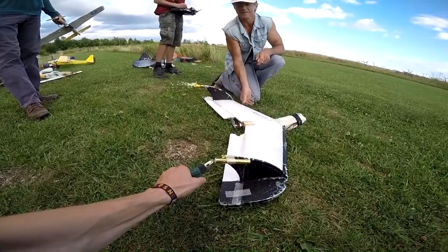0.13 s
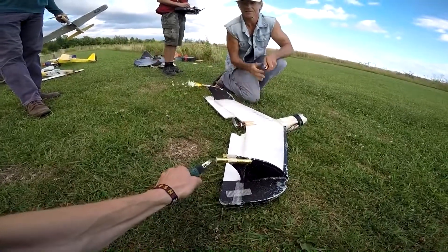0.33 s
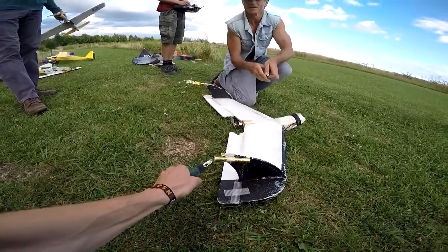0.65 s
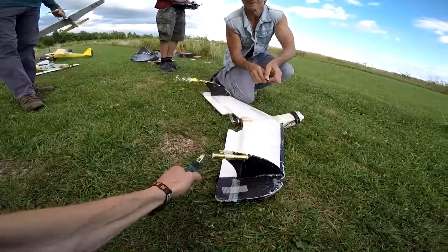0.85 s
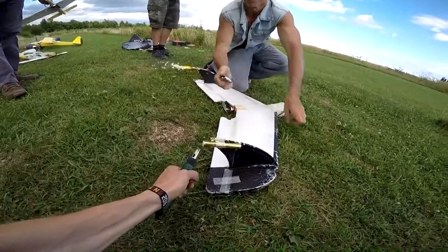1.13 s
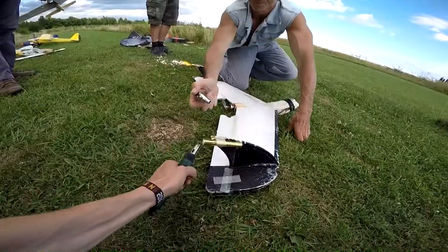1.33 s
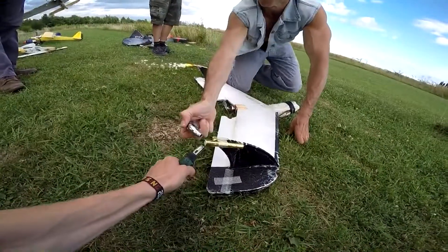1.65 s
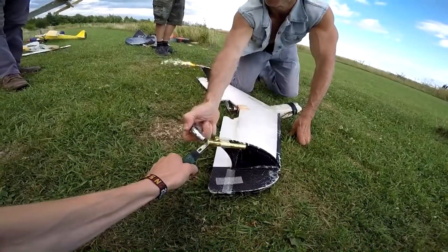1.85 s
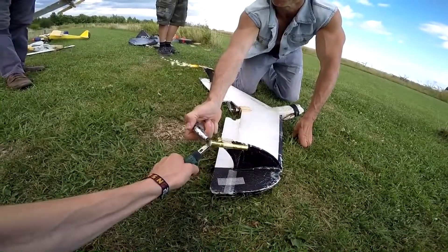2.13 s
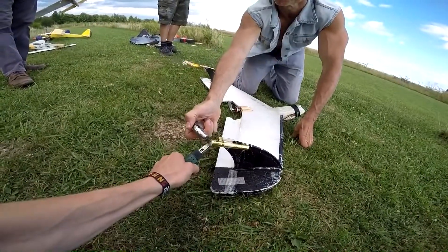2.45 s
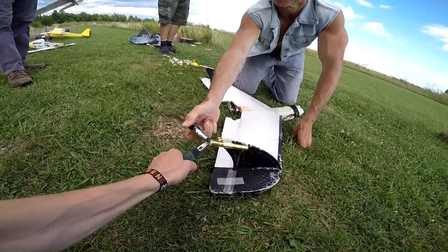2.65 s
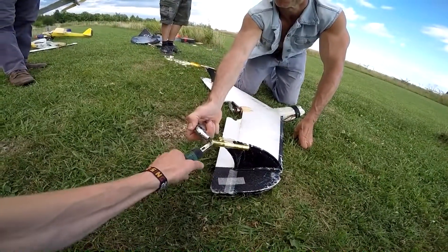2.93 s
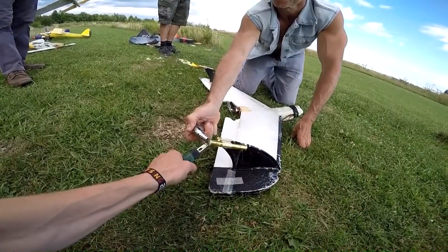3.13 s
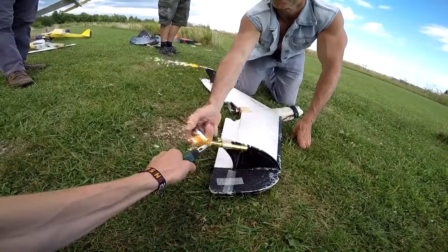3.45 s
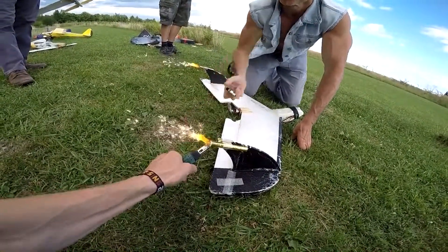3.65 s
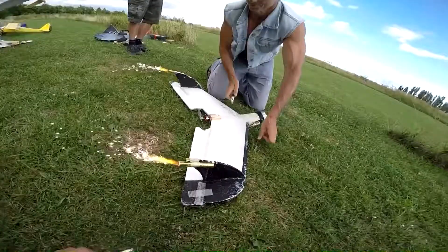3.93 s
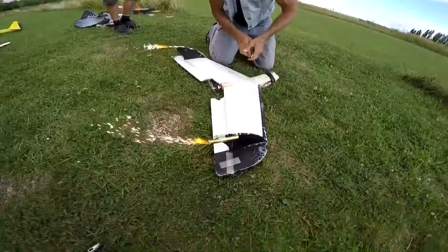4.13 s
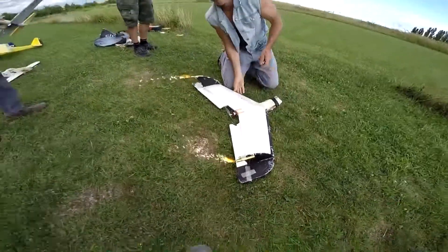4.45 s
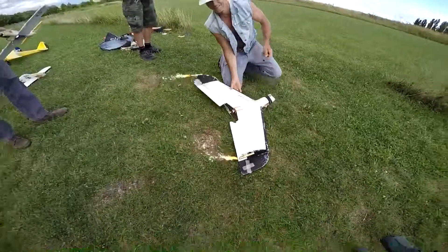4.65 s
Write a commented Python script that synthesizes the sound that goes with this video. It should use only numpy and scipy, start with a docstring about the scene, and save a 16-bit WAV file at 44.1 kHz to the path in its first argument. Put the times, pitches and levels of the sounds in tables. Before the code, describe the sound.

A lit sparkler fizzes outdoors while a lighter snaps and hisses, then a second sparkler catches and wind rumbles on a body-worn camera.

```python
"""From the start a lit sparkler fountain on a model plane fizzes over a faint open field and light wind.
A gas lighter snaps and hisses at a second sparkler; near 3.5 s it catches and the fizz swells.
Near 3.8 s wind rumbles harder on a body-worn camera as its wearer steps back, then a double clack follows.
Soft knocks rock the camera and stray spits burst from the flame all along.
Hisses are filtered noise with tiny sparks, snaps are short noise cracks, knocks are brief slow swings."""
import sys
import numpy as np
from scipy import signal
from scipy.fft import rfft, irfft, next_fast_len
from scipy.io import wavfile
from scipy.ndimage import uniform_filter1d

SR = 44100
rng = np.random.default_rng(int(sys.argv[2]) if len(sys.argv) > 2 else 0)


def to_wav(sig):
    """Store sig (one row per channel, or 1-D mono) as 16-bit WAV at the path in sys.argv[1].

    Samples outside -1..1 are clipped; the rate is SR.
    """
    pcm = np.clip(np.atleast_2d(sig), -1, 1) * 32767
    pcm = np.round(pcm).astype(np.int16)
    wavfile.write(sys.argv[1], SR, pcm.T)  # frames by channels


N = 211274


def undb(db):
    """Turn decibels into a gain."""
    return 10 ** (np.asarray(db) / 20)


def unit(x):
    """Scale a sound to an rms of 1."""
    return x / np.sqrt(np.mean(x ** 2))


def level_curve(table):
    """Join the (time, level) points of a table with straight lines, one value per sample."""
    times, levels = np.transpose(table)
    return np.interp(np.arange(N) / SR, times, levels)


def add(track, s, sound):
    """Mix a sound into the track at time s."""
    start = max(int(s * SR), 0)
    part = sound[:max(N - start, 0)]
    track[start:start + len(part)] += part


def colour(x, spectrum, bumps=()):
    """Filter a sound by a (Hz, dB) outline plus (Hz, width, dB) bumps, with no echo ahead of the sound."""
    size = 2 * next_fast_len(len(x))
    hz = np.maximum(np.fft.rfftfreq(size, 1 / SR), 1)
    points, levels = np.transpose(spectrum)
    db = np.interp(np.log(hz), np.log(points), levels)
    for centre, width, height in bumps:
        db = db + height * np.exp(-2 * ((hz - centre) / width) ** 2)
    # folding the cepstrum forward in time gives the minimum-phase filter
    cepstrum = irfft(np.log(undb(db)))
    cepstrum[1:size // 2] *= 2
    cepstrum[size // 2 + 1:] = 0
    response = np.exp(rfft(cepstrum))
    return irfft(rfft(x, size) * response)[:len(x)]


def walk(rate):
    """Wander at random: levels held for 1 / rate s, smoothed twice, with an rms of 1."""
    hold = max(int(SR / rate), 1)
    steps = rng.standard_normal(N)[np.arange(N) // hold]
    smooth = uniform_filter1d(steps, hold)
    return unit(uniform_filter1d(smooth, hold))


# Tone of the open field: (pitch [Hz], relative level [dB])
FIELD_TONE = [(30, -22), (150, 4.5), (300, 1.5), (550, -2), (1000, -3.5), (2000, -10), (5000, -27),
              (16000, -21)]
FIELD_DB = -68.5


def field(sway_db=0.2):
    """The faint, even rush of open country: filtered noise that sways very slightly."""
    rush = unit(colour(rng.standard_normal(N), FIELD_TONE))
    return rush * undb(FIELD_DB + sway_db * walk(3.114))


def buffet(level_db, spectrum, evenness):
    """Swirls of air beat on the camera: noise whose own swells are partly evened out."""
    eddies = unit(colour(rng.standard_normal(N), spectrum))
    power = uniform_filter1d(eddies ** 2, SR // 10)
    return unit(eddies / power ** (evenness / 2)) * undb(level_db)


# Deep rumble, light and then a gust, before trim and flutter: (time [s], level [dB])
GUST_LEVEL = [(0, -49), (2.1, -48), (2.9, -50.5), (3.63, -51), (3.77, -34.5), (4.07, -28.5), (4.2, -37.5),
              (4.55, -37.5), (4.79, -38.5)]
# Tone of the deep rumble: (pitch [Hz], relative level [dB])
RUMBLE_TONE = [(5, -17), (15, 3), (22, 5), (32, -3.5), (45, -8.5), (58, -13), (80, -25), (200, -60.5)]
# Tone of the finer swirls: (pitch [Hz], relative level [dB])
EDDY_TONE = [(25, -14), (55, 7), (85, 0.5), (120, -9.5), (170, -17), (250, -27.5), (500, -39.5),
             (1500, -58)]
# finer swirls: level in light wind before flutter (dB), and dB gained per dB of gust
EDDY_DB, EDDY_GROWTH = -56.5, 0.56


def wind(trim_db=1, deep_flutter_db=2.0, fine_flutter_db=4.0, flutters_per_s=11):
    """One gust drives a deep rumble and, less steeply, finer swirls; each flutters on its own."""
    gust_db = level_curve(GUST_LEVEL)
    deep_db = gust_db + trim_db + deep_flutter_db * walk(flutters_per_s)
    growth_db = EDDY_GROWTH * (gust_db - gust_db[0])
    fine_db = EDDY_DB + growth_db + fine_flutter_db * walk(flutters_per_s)
    rumble = buffet(deep_db, RUMBLE_TONE, evenness=0.98)
    swirls = buffet(fine_db, EDDY_TONE, evenness=0.32)
    return rumble + swirls


# Soft knocks on the camera:
# (time [s], level of the swing's envelope peak [dB], pitch [Hz], thud relative to the swing [dB])
KNOCKS_ON_CAMERA = [(0.088, -34.5, 103, -22), (0.2, -40.5, 84.5, -22), (0.744, -40, 78, -24),
                    (1.937, -40, 72, -34), (3.085, -32, 102, -25.5), (3.590, -41, 105, -5.5),
                    (3.799, -33, 113, -19.5), (4.080, -32.5, 92, -14.5)]
KNOCK_SWELL_CYCLES = 0.47  # a knock's envelope peaks after this much of one rocking cycle


def knocks(case_hz=300, rub_db=-5):
    """Soft blows rock the camera on its mount for a cycle or two; the case answers with a dull thud."""
    out, t = np.zeros(N), np.arange(SR // 8) / SR
    rub_tone = [(100, -4.5), (350, -10), (520, -20.5), (900, -33), (2000, -58)]
    for s, db, hz, thud_db in KNOCKS_ON_CAMERA:
        swell = KNOCK_SWELL_CYCLES / hz  # seconds
        shape = t / swell * np.exp(1 - t / swell)
        rub = unit(colour(rng.standard_normal(len(t)), rub_tone))
        case_note = np.sin(2 * np.pi * case_hz * t) * np.exp(-t / (2 * swell))
        thud = undb(rub_db) * rub + case_note
        swing = -np.sin(2 * np.pi * hz * t)
        add(out, s, undb(db) * shape * (undb(thud_db) * thud + swing))
    return out


def crack(t, length, fall_s=0.00186):
    """A few milliseconds of dense tiny impacts that die fast, with nearly equal strength at all pitches."""
    shape = np.exp(-np.maximum(t - length, 0) / fall_s)
    burst = rng.standard_normal(len(t)) * shape
    for _ in range(4):  # level all pitches, then shorten again
        even = irfft(np.exp(1j * np.angle(rfft(burst))), len(t))
        burst = even * np.sqrt(shape)
    return burst / np.sqrt(np.mean(burst[t < length] ** 2))


def set_onset(sound, t, db):
    """Set the rms level of a burst's first 3 ms."""
    return undb(db) * sound / np.sqrt(np.mean(sound[t < .003] ** 2))


# Notes that ring on after a snap, before ring_db and the colouring:
# (pitch [Hz], relative level [dB], time to fall by 60 dB [s])
SNAP_RINGS = [(1850, -21, 0.058), (2300, -45, 0.021), (2673, -27.5, 0.11), (3190, -1, 0.015),
              (4000, -38, 0.045), (4840, -33, .03), (6900, -26, .04)]


def snaps(events, spectrum, body, trim_db, ring_db, scatter_db, scatter_t60=0.044, dull_db_per_octave=48):
    """A short crack, a ring and fading scattered noise in a hollow body; softer contact loses treble."""
    out, t = np.zeros(N), np.arange(SR // 10) / SR
    ring = np.zeros(len(t))
    for hz, db, t60 in SNAP_RINGS:
        ring += undb(ring_db + db - 60 * t / t60) * np.sin(2 * np.pi * hz * t)
    points, levels = np.transpose(spectrum)
    grid = np.geomspace(points[0], points[-1], 60)
    base_db = np.interp(np.log(grid), np.log(points), levels)
    for s, db, length, brightness, dull_hz in events:
        scatter = undb(scatter_db - 60 * t / scatter_t60) * rng.standard_normal(len(t))
        octaves = np.log2(grid / dull_hz)
        # tilt the whole tone, then drop the treble over one octave
        outline = base_db + brightness * octaves - dull_db_per_octave * np.clip(octaves, 0, 1)
        sound = colour(crack(t, length) + ring + scatter, np.column_stack([grid, outline]), body)
        add(out, s, set_onset(sound, t, db + trim_db))
    return out


# Double clack, hard and then soft: (time [s], level before trim_db [dB],
# crack length [s], brightness [dB per octave], dull above [Hz])
CLACK_TIMES = [(4.0631, -15.5, 0.00164, .3, 14000), (4.0836, -16, .0024, -.3, 2970)]
# Tone of a clack: (pitch [Hz], relative level [dB])
CLACK_TONE = [(150, -22), (700, -17.5), (1850, -6.5), (2700, -11), (6000, -15.5), (11000, -22.5),
              (15000, -35)]
# Its resonances (+) and hollows (-): (pitch [Hz], width [Hz], level change [dB])
CLACK_HOLLOWS = [(545, 300, 7.5), (860, 210, -4.5), (1250, 98, 4.5), (1720, 110, 4.5), (1970, 110, -6),
                 (2490, 490, 10), (3720, 940, 6.5), (8000, 1800, -4.5), (10400, 1700, 8), (12400, 350, 6)]


def hand_clacks():
    """Two clacks as the hand draws back: cracks coloured by a hollow body."""
    return snaps(CLACK_TIMES, CLACK_TONE, CLACK_HOLLOWS, trim_db=-8.0, ring_db=-9, scatter_db=-17)


# Thin clicks of the lighter's trigger: (time [s], level before trim_db [dB],
# crack length [s], brightness [dB per octave], dull above [Hz])
CLICK_TIMES = [(1.5003, -11.5, .0018, 0.11, 13000), (2.7313, -11.5, 0.00235, 0.15, 14100)]
# Tone of a click: (pitch [Hz], relative level [dB])
CLICK_TONE = [(150, -68), (700, -63), (1850, -34), (2700, -12), (6000, -16), (11000, -25), (15000, -35)]
# Its resonances (+) and hollows (-): (pitch [Hz], width [Hz], level change [dB])
CLICK_HOLLOWS = [(2680, 580, 11), (3160, 190, -10), (3620, 510, 11.5), (4270, 430, -12.5), (5430, 710, 6.5),
                 (6460, 180, 10), (7600, 430, 8), (8100, 250, -6), (9400, 660, 8.5), (10400, 300, 3.5),
                 (12000, 350, 4)]


def trigger_clicks():
    """The trigger clicks: cracks with little bass, so they sound thin."""
    return snaps(CLICK_TIMES, CLICK_TONE, CLICK_HOLLOWS, trim_db=-12.5, ring_db=-13.5, scatter_db=-14.5)


# Lighter's striker, fired hard, and fainter snaps as the trigger is let go: (time [s], level before trim_db
# [dB], # crack length [s], brightness [dB per octave], dull above [Hz])
STRIKE_TIMES = [(0.3071, -19, 0.0033, 0.1, 12000), (0.6644, -37.5, 0.003, 5, 13000),
                (0.8909, -19, 0.0026, 0.2, 14000), (2.804, -33, .0018, 6.5, 13000),
                (3.0753, -17.5, 0.0021, 1.2, 14000)]
# Tone of a strike: (pitch [Hz], relative level [dB])
STRIKE_TONE = [(150, -35), (700, -38), (1850, -9), (2700, -8.5), (6000, -17.5), (11000, -27), (15000, -39)]
# Its resonances (+) and hollows (-): (pitch [Hz], width [Hz], level change [dB])
STRIKE_HOLLOWS = [(1490, 87, -11), (1920, 75, 7), (2690, 540, 9), (3160, 250, -7), (3520, 180, 7),
                  (4720, 380, 3.5), (5290, 410, 6), (7150, 1740, -6), (8000, 660, 4.5), (9260, 670, -2),
                  (11770, 1200, 6)]


def striker_snaps():
    """The striker snaps: sharp cracks with a ring and scatter in the lighter's body."""
    return snaps(STRIKE_TIMES, STRIKE_TONE, STRIKE_HOLLOWS, trim_db=-8.0, ring_db=-15.5, scatter_db=-9.5)


def fizz(level_db, spectrum, bumps, grain_db, grains_per_s=900, grain_spread_db=3):
    """A jet of gas hisses and flutters slightly while many tiny sparks pop in it."""
    sparks = (rng.random(N) < grains_per_s / SR) * rng.choice([-1, 1], N)
    sparks = sparks * undb(grain_spread_db * np.minimum(rng.exponential(size=N), 5))
    mix = rng.standard_normal(N) + undb(grain_db) * unit(sparks)
    jet = unit(colour(mix, spectrum, bumps))
    flutter_db = .45 * walk(45)
    return jet * undb(level_db + flutter_db)


# Puffs of gas from the lighter, each beginning close to a strike:
# (opening time [s], closing time [s], hiss level at first [dB])
PUFFS = [(0.86, 2.26, -64.5), (3.1, 3.803, -61)]
GAS_ATTACK_S, GAS_RELEASE_S, GAS_SWELL_DB_PER_S = 0.029, 0.11, 2.2


def gas_flow_db():
    """Hiss level of the lighter: gas opens fast, swells while held and dies away."""
    t, flow = np.arange(N) / SR, 1e-6  # a tiny floor keeps the logarithm finite
    for opens, closes, db in PUFFS:
        held = np.clip(t, opens, closes) - opens
        attack = np.minimum(held / GAS_ATTACK_S, 1)
        release = np.exp(-np.maximum(t - closes, 0) / GAS_RELEASE_S)
        flow = flow + attack * release * undb(db + GAS_SWELL_DB_PER_S * held)
    return 20 * np.log10(flow)


# Tone of the gas jet: (pitch [Hz], relative level [dB])
JET_TONE = [(300, -38), (1300, -23), (2100, -12.5), (2700, -1.5), (3900, -3), (5200, -1), (7000, -0.5),
            (9500, -8.5), (11000, -24), (13500, -7.5), (16000, -19)]
# Resonances of the lighter's nozzle: (pitch [Hz], width [Hz], level change [dB])
NOZZLE_RESONANCES = [(1610, 160, 18), (2930, 250, 3), (3730, 210, 3.5)]
# Resonances (+) and hollows (-) of the camera's plastic case, also used for the first sparkler and
# the spits: (pitch [Hz], width [Hz], level change [dB])
CASE_RESONANCES = [(1700, 190, 6.5), (2795, 870, 10), (3770, 400, 8), (4314, 350, -6), (5300, 220, 4.5),
                   (6400, 960, 2.5), (7080, 280, -9.5), (7300, 260, 2.5), (7900, 360, -3), (9480, 310, 4),
                   (11200, 1200, -3), (12200, 1500, 1.5)]


def gas_jet():
    """Gas hisses through the lighter's nozzle and is heard through the camera case."""
    bumps = list(CASE_RESONANCES) + list(NOZZLE_RESONANCES)
    return fizz(gas_flow_db(), JET_TONE, bumps, grain_db=-11)


# Largest spits of burning powder: (time [s], level before trim_db [dB])
LARGE_SPITS = [(1.2276, -43), (2.5395, -47), (3.47, -39.5), (3.6404, -35.5), (3.8163, -32.5), (4.1998, -35),
               (4.6154, -42)]
# Tone of a spit: (pitch [Hz], relative level [dB])
SPIT_TONE = [(300, -20), (1300, -12), (2200, 3), (4000, 0.5), (7000, 1), (11000, -7), (16000, -30)]
# Hiss of the sparkler already alight, before flutter: (time [s], level [dB])
FIRST_HISS = [(0, -61), (.7, -61), (2.7, -60), (3.8, -60), (4.79, -64)]
# Hiss of the second sparkler as it catches, before flutter: (time [s], level [dB])
SECOND_HISS = [(3.1, -79), (3.44, -65), (3.49, -57), (3.57, -61), (3.8, -58), (4.05, -56.5), (4.3, -61),
               (4.79, -63.5)]
# smaller spits by chance: how many, and their middle level above the hiss before trim_db
SPITS_PER_S, SPIT_OVER_HISS_DB = 6, 10.5


def spits(trim_db=-10, length=0.0025, spread_db=2):
    """Larger grains of powder burst from the flame: a few set ones, and small ones that follow the fizz."""
    out, t = np.zeros(N), np.arange(SR // 20) / SR
    hiss_power = undb(level_curve(FIRST_HISS)) ** 2 + undb(level_curve(SECOND_HISS)) ** 2
    hiss_db = 10 * np.log10(hiss_power)
    small = []
    for when, size in rng.random((int(SPITS_PER_S * N / SR), 2)):
        db = hiss_db[int(when * N)] + SPIT_OVER_HISS_DB + spread_db * (2 * size - 1)
        small.append((when * N / SR, db))
    for s, db in list(LARGE_SPITS) + small:
        sound = colour(crack(t, length), SPIT_TONE, CASE_RESONANCES)
        add(out, s, set_onset(sound, t, db + trim_db))
    return out


# Tone of the second sparkler: (pitch [Hz], relative level [dB])
SECOND_TONE = [(300, -30), (1200, -7.5), (2000, 0.5), (3000, -1.5), (4500, 3.5), (6000, 1.5), (7800, -2),
               (9500, -2.5), (12300, -10.5), (14000, -24), (16000, -22)]
# Resonances (+) and hollows (-) of its tube: (pitch [Hz], width [Hz], level change [dB])
TUBE_RESONANCES = [(2930, 490, 7.5), (3600, 290, 9), (4420, 360, -10), (5500, 380, 1.5), (6800, 240, -3),
                   (7650, 600, 3.5), (9000, 370, -6), (11600, 600, -1), (12100, 570, 10.5)]


def second_sparkler():
    """The second sparkler catches: its jet and strong sparks fizz through its tube."""
    return fizz(level_curve(SECOND_HISS), SECOND_TONE, TUBE_RESONANCES, grain_db=1.5)


# Tone of the first sparkler: (pitch [Hz], relative level [dB])
FIRST_TONE = [(300, -40), (1200, -15.5), (2000, -5.5), (2600, -3.5), (4000, -1.5), (6000, 0.5),
              (8000, -2.5), (10500, -7), (14000, -9), (16000, -10)]


def first_sparkler():
    """The sparkler already alight: its jet and sparks fizz throughout, coloured by the camera case."""
    return fizz(level_curve(FIRST_HISS), FIRST_TONE, CASE_RESONANCES, grain_db=-2.0)


def scene():
    """Everything as it reaches the one microphone, from the background to the sparklers."""
    background = field() + wind() + knocks()
    lighter = trigger_clicks() + striker_snaps() + gas_jet()
    sparklers = spits() + second_sparkler() + first_sparkler()
    return (background + hand_clacks() + lighter + sparklers)[None]


TOP_HZ = 15200


def record(dry):
    """The camera cuts the top of the treble with a steep low-pass filter."""
    low_pass = signal.ellip(8, .2, 70, TOP_HZ, fs=SR, output="sos")
    return signal.sosfilt(low_pass, dry)


dry = scene()
out = record(dry)
to_wav(out)
```